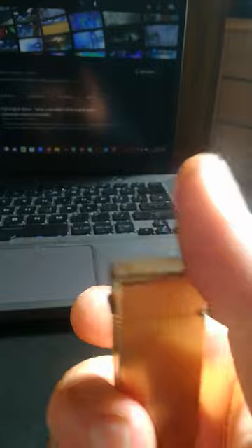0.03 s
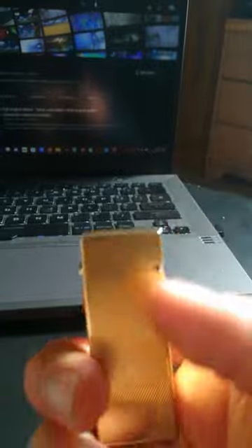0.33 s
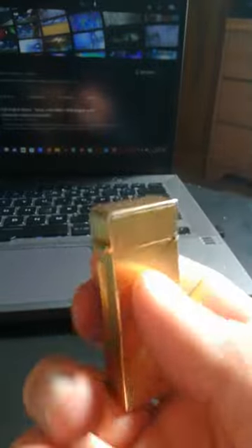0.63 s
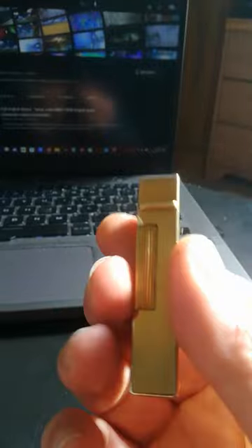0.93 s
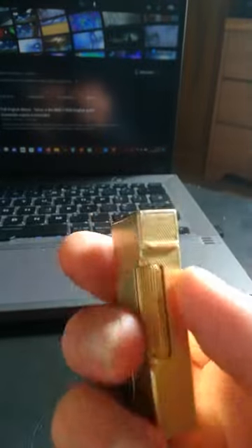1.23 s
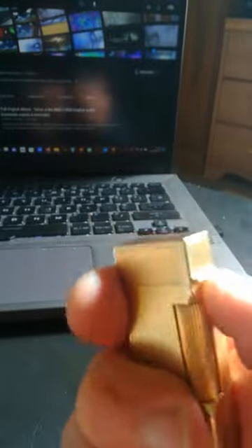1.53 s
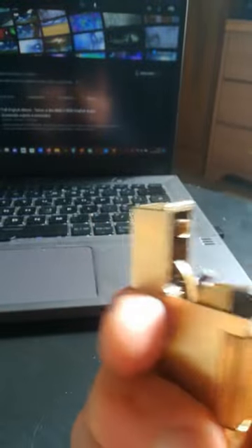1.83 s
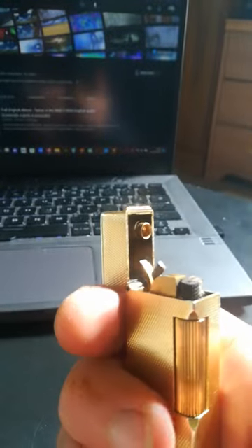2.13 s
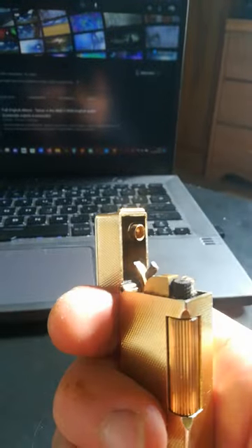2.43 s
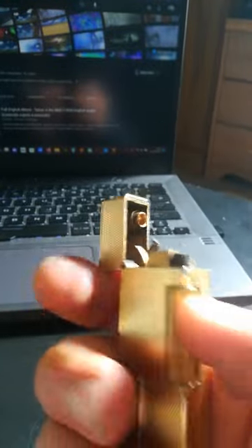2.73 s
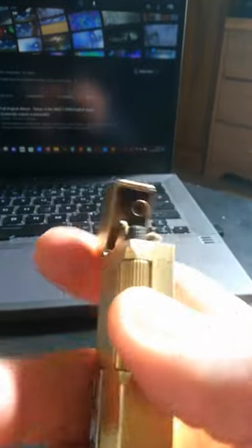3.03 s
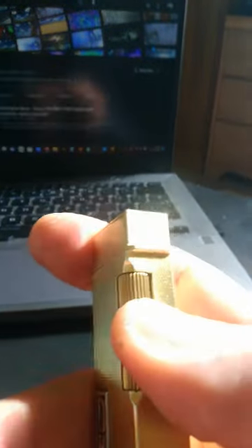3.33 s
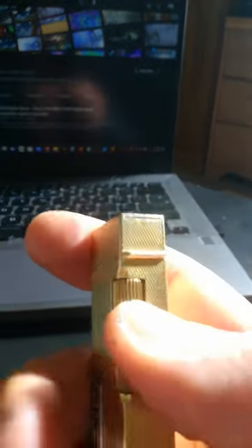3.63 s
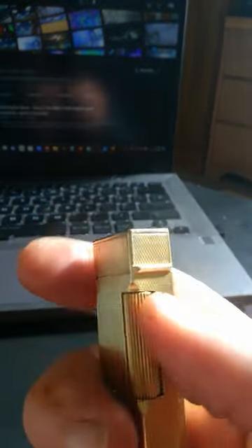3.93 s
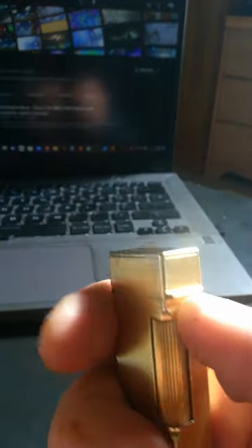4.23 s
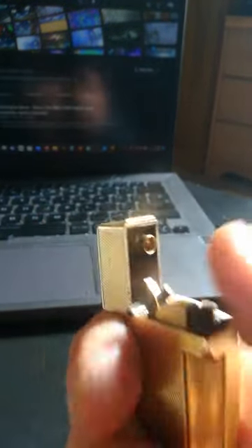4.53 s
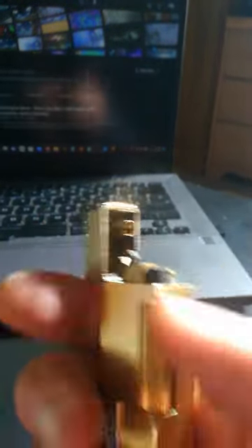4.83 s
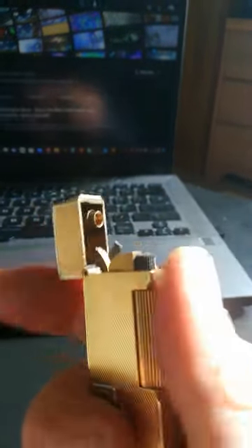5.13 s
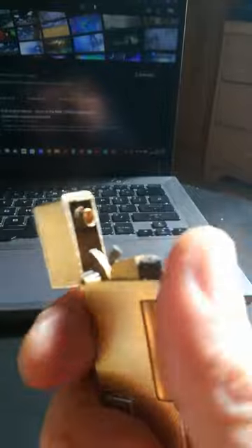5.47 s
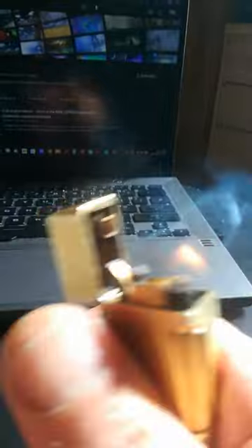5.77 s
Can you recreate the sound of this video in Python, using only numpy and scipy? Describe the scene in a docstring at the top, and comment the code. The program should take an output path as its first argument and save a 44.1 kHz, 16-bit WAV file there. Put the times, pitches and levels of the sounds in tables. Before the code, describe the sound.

In a quiet room a laptop fan blows faintly over a low hum. After about three seconds, a brass lighter's lid snaps shut with a short, bright ringing click, and a second later it is flicked open with another. Near the end the roller scrapes the flint sharply and clacks as the gas catches with a soft, low puff. The lighter is very close and to the left.

```python
"""A brass lighter is handled close to a phone's left microphone. Its lid snaps shut and is flicked
open, and each knock makes the metal ring. The thumb spins the roller over the flint, which scrapes
and throws sparks; the gas catches with a soft puff, and the roller clacks as the thumb slips off.
Behind it, a laptop hums and its fan blows in a quiet room."""
import sys
import numpy as np
from scipy import signal
from scipy.fft import rfft, irfft
from scipy.io import wavfile

SR = 44100
rng = np.random.default_rng(int(sys.argv[2]) if len(sys.argv) > 2 else 0)


def wav_record(signal):
    """Record a signal, one row per channel, as 16-bit PCM in the file named by sys.argv[1]."""
    frames = np.transpose(np.atleast_2d(signal))
    bounded = np.clip(frames, -1, 1)
    # unit amplitude maps onto the largest positive 16-bit level
    quanta = np.round(bounded * 32767).astype(np.int16)
    wavfile.write(sys.argv[1], SR, quanta)


N = 255780
TIME = np.arange(N) / SR
FREQS = np.fft.rfftfreq(N, 1 / SR)
STRIKE_S = 5.6130  # the roller bites the flint; scrape, sparks and puff are timed from here


def gain_of(db):
    """Turns decibels into a number to multiply a sound by."""
    return 10 ** (np.asarray(db) / 20)


def unit_power(x):
    """Scales a signal to an average power of one."""
    return x / np.sqrt(np.mean(x ** 2) + 1e-20)


def value_at(table, hz):
    """Reads between a table's rows, on a scale of octaves."""
    row_hz, values = np.transpose(table)
    return np.interp(np.log(hz + 1), np.log(row_hz + 1), values)


def add(mix, start_s, sound):
    """Mixes a sound in at the given time."""
    part = mix[round(start_s * SR):][:len(sound)]
    part += sound[:len(part)]


def tone_filter(tone, size=4096):
    """Builds a filter from a tone table; it never sounds ahead of its input."""
    log_gain = np.log(gain_of(value_at(tone, abs(np.fft.fftfreq(size, 1 / SR)))))
    return np.fft.ifft(np.exp(np.conj(signal.hilbert(log_gain)))).real[:size // 2]


def colour(x, tone):
    """Gives a sound a tone. White noise keeps its power, so only the table's shape counts."""
    taps = tone_filter(tone)
    return signal.oaconvolve(x, taps / np.linalg.norm(taps))[:N]


def grains(per_s, spread_db):
    """A dense crackle of tiny clicks of unequal size, as when rough surfaces rub."""
    size = gain_of(spread_db * np.minimum(rng.exponential(1, N), 3))
    sign = rng.choice([-1, 1], N)
    return unit_power(size * sign * (rng.random(N) < per_s / SR))


def swell(lag_s, rise_db_per_s, hold_s, fall_db_per_s):
    """A level that rises, holds and fades, reaching its top lag_s after the roller bites."""
    age = TIME - STRIKE_S - lag_s
    return gain_of(rise_db_per_s * np.minimum(age, 0) - fall_db_per_s * np.maximum(age - hold_s, 0))


# rush of the fan and room air on the left: (frequency [Hz], level in a 1 Hz band [dB])
FAN_TONE = [(12, -114), (30, -92), (70, -97.5), (100, -99.5), (135, -99), (220, -96), (330, -100),
            (460, -105), (750, -102), (1100, -102), (1650, -105), (2500, -108), (6000, -113), (15500, -116)]
# pitches that the fan's air duct boosts: (frequency [Hz], width [Hz], boost [dB])
FAN_DUCT = [(1080, 47, 3.5), (1520, 110, 4), (1826, 91.8, 4.9), (2094, 33.5, 1)]
# how alike the rush is at the two microphones: (frequency [Hz], likeness [0 to 1])
FAN_LIKENESS = [(40, .9), (130, 1), (300, 0.61), (650, 0.4), (1400, 0.25), (3000, 0.18), (7000, .12),
                (15000, .05)]
# how much louder it is on the left: (frequency [Hz], left minus right [dB])
FAN_BALANCE = [(60, -1), (200, -1.5), (380, .5), (700, 4.5), (1290, 3.5), (2380, 3), (4400, 3), (8120, 1.5),
               (15000, 1)]
def fan(lag_s=0.00059):
    """Air rushes through the laptop's duct and reaches the right microphone a little later."""
    left, unrelated = rfft(rng.standard_normal((2, N)))
    likeness = np.clip(value_at(FAN_LIKENESS, FREQS), 0, 1)
    delayed = left * np.exp(-2j * np.pi * FREQS * lag_s)
    right = likeness * delayed + np.sqrt(1 - likeness ** 2) * unrelated
    right /= gain_of(value_at(FAN_BALANCE, FREQS))
    duct_db = sum(db / (1 + (2 * (FREQS - hz) / width) ** 2) for hz, width, db in FAN_DUCT)
    tone = gain_of(value_at(FAN_TONE, FREQS) + duct_db)
    return irfft(np.array([left, right]) * tone, N) * np.sqrt(SR / 2)


# mains hum: (frequency [Hz], left level [dB], right level [dB], lag on the right [radians])
HUM_NOTES = [(100.2, -73.5, -74, .5), (198, -84.5, -81.5, 0.75)]
def hum(waver=0.2, drift_hz=3):
    """Mains power hums on two low notes that waver slowly in level and pitch."""
    drift = unit_power(irfft(rfft(rng.standard_normal(N)) * (FREQS < drift_hz), N))
    notes = np.zeros((2, N))
    for hz, left_db, right_db, lag in HUM_NOTES:
        phase = 2 * np.pi * hz * TIME + 2 * waver * drift
        notes += gain_of([[left_db], [right_db]]) * np.sin([phase, phase - lag])
    return np.sqrt(2) * notes * (1 + waver * drift)


# how long the room rings: (frequency [Hz], time to fade by 60 dB [s])
ROOM_FADE = [(200, 1.6), (1000, 0.3), (3000, 0.18), (7000, .27), (11000, 0.14), (15500, 0.24)]
# tone of that ringing: (frequency [Hz], relative level [dB])
ROOM_TONE = [(100, 0.5), (700, -1), (1500, -2), (3000, 2), (5000, -1.5), (7000, -2.5), (10000, 1.5),
             (15500, -2.5)]
# first bounces off the desk and walls: (delay [s], level [dB])
ROOM_ECHOES = [(0.0105, -29), (0.0158, -29.5), (.0172, -26.5), (.0255, -35)]
def room(x, tail_db, build_s=0.0099):
    """A few clear echoes and a blurred tail of sound whose treble dies before its bass."""
    count = SR // 2
    hz, t, bands = signal.stft(rng.standard_normal(count), SR, nperseg=256)
    bands *= gain_of(value_at(ROOM_TONE, hz)[:, None] - 60 * t / value_at(ROOM_FADE, hz)[:, None])
    tail = signal.istft(bands, SR, nperseg=256)[1][:count]
    tail *= 1 - np.exp(-(TIME[:count] / build_s) ** 2)
    tail *= gain_of(tail_db) / np.linalg.norm(tail)
    for delay_s, db in ROOM_ECHOES:
        add(tail, delay_s, gain_of([db]))
    return signal.oaconvolve(x, tail)[:N]


# what the right microphone loses of the lighter's sound: (frequency [Hz], level change [dB])
SHADOW_LOSS = [(100, -3), (700, -6.5), (1500, -7), (3000, -11), (5000, -21.5), (7000, -21.5),
               (10000, -25.5), (15000, -29)]
def shadow(x):
    """The right microphone faces away from the lighter, so it hears it dull and weak."""
    return signal.oaconvolve(x, tone_filter(SHADOW_LOSS))[:N]


def crack(hits, tone, boost_db):
    """The first touch of each hit is one sharp push, spread over a wide range of pitches."""
    pushes = np.zeros(N)
    for start_s, db in hits:
        add(pushes, start_s, gain_of([db + boost_db]))
    return colour(pushes, tone)


def ring(hits, notes, low_cut_hz, contact_s):
    """Each hit rings a brass part, which the hand quickly damps; wider notes die sooner."""
    t = np.arange(2048) / SR
    ping = sum((-1) ** k * gain_of(db) * width * np.exp(-np.pi * width * t) * np.cos(2 * np.pi * hz * t)
               for k, (hz, width, db) in enumerate(notes))
    ping *= 1 - np.exp(-t / contact_s)
    # so small a part gives off little bass
    ping = signal.sosfilt(signal.butter(6, low_cut_hz, "high", fs=SR, output="sos"), ping)
    ping /= np.sqrt(np.mean(ping[:256] ** 2))
    out = np.zeros(N)
    for start_s, db in hits:
        add(out, start_s, gain_of(db) * ping)
    return out


# a finger landing on the case: (time [s], relative level [dB])
TAP_HITS = [(4.8480, -68)]
# its dull tone: (frequency [Hz], relative level [dB])
TAP_TONE = [(1500, -25), (2800, 0), (3900, -1), (5000, -9), (9000, -14), (15000, -25)]
def finger_tap():
    """A finger taps the case as the grip shifts."""
    return crack(TAP_HITS, TAP_TONE, boost_db=22)


# rubs as the lid is eased up or flicked and the roller starts: (time [s], half length [s], level [dB])
SLIDE_RUBS = [(1.598, .014, -71), (1.640, .008, -73), (1.674, 0.014, -68.5), (4.388, 0.006, -53),
              (5.589, 0.0044, -47), (5.603, 0.0044, -36)]
# their tone: (frequency [Hz], relative level [dB])
SLIDE_TONE = [(1000, -34.5), (4000, -18), (6000, -1.5), (7500, -0.5), (9300, -3.5), (10800, -17),
              (16000, -25)]
def sliding():
    """Brass slides on brass at the lid's hinge and the roller's axle, with a faint, fine crackle."""
    touch = sum(gain_of(db) * np.exp(-((TIME - s) / half_s) ** 2) for s, half_s, db in SLIDE_RUBS)
    return colour(touch * grains(per_s=5000, spread_db=2), SLIDE_TONE)


# the lid landing on the case: (time [s], relative level [dB])
SHUT_HITS = [(3.1926, -17), (3.1951, -29.5)]
# notes of the closed case: (frequency [Hz], width [Hz], relative level [dB])
SHUT_NOTES = [(636.5, 140, -17.5), (1230, 240, -9.5), (1711, 333, -10.5), (3203, 280, -6),
              (3900, 360, -0.5), (4620, 360, -5.5), (6280, 600, 1), (7040, 540, 2), (7640, 200, -7.5),
              (8560, 310, -3.5), (9440, 288, -6.5), (10000, 446.4, -3), (12400, 830, -3.5),
              (14800, 900, -9.5)]
# tone of the first touch: (frequency [Hz], relative level [dB])
SHUT_TONE = [(530, -46.5), (900, -17), (1170, -14.5), (1270, -20.5), (1450, -13.5), (1660, -20.5),
             (1870, -19), (2710, -22), (3320, -11.5), (4310, -15), (6800, 1), (10800, -14), (12700, -9),
             (15700, -18)]
def lid_shut():
    """The lid snaps onto the case; gives the ring and the crack."""
    return (ring(SHUT_HITS, SHUT_NOTES, low_cut_hz=503.9, contact_s=0.0001),
            crack(SHUT_HITS, SHUT_TONE, boost_db=25.5))


# the lid hitting its stop: (time [s], relative level [dB])
OPEN_HITS = [(4.3941, -31), (4.3947, -19.5), (4.3970, -31)]
# notes of the open lid: (frequency [Hz], width [Hz], relative level [dB])
OPEN_NOTES = [(2450, 90, -13), (3080, 280, -15), (3430, 220, -19.5), (4590, 180, 2.5), (5330, 220, -5),
              (5770, 400, -4.5), (6240, 330, 3.5), (7960, 350, -14), (9000, 220, -7), (9550, 87, 1),
              (9940, 400, -6), (11100, 280, -17), (12400, 310, -23)]
# tone of the first touch: (frequency [Hz], relative level [dB])
OPEN_TONE = [(1290, -54), (2200, -22), (2630, -21.5), (3010, -11), (3680, -16), (4350, -1), (5450, -2),
             (6100, -1), (6720, -7), (8280, -19), (9120, -15.5), (9410, -4), (9960, -10), (11400, -23.5),
             (15000, -33.5)]
def lid_open():
    """The lid is flicked open against its stop; gives the ring and the crack."""
    return (ring(OPEN_HITS, OPEN_NOTES, low_cut_hz=2660, contact_s=0.00023),
            crack(OPEN_HITS, OPEN_TONE, boost_db=24.5))


# the roller knocking in its seat: (time [s], relative level [dB])
CLACK_HITS = [(5.6617, -10)]
# notes of the roller: (frequency [Hz], width [Hz], relative level [dB])
CLACK_NOTES = [(2010, 190, -16), (2870, 210, -8), (4530, 310, -5), (5226, 290, 6.5), (5835, 450, -0.5),
               (6440, 200, -3), (6960, 400, 0.5), (9676, 150, 7), (9900, 170, -0.5), (10870, 530, -3.5),
               (12000, 180, -9), (13100, 400, -16), (14700, 1000, -15)]
# tone of the first touch: (frequency [Hz], relative level [dB])
CLACK_TONE = [(790, -40), (1350, -25.5), (1890, -17), (2140, -12), (2350, -18), (3130, -10.5),
              (3890, -20.5), (4870, 2.5), (5450, 1), (5980, -9), (6980, 0), (8480, -17), (9890, 1),
              (10700, -10), (15700, -26)]
def roller_clack():
    """The roller clacks as the thumb slips off; gives the ring and the crack."""
    return (ring(CLACK_HITS, CLACK_NOTES, low_cut_hz=1150, contact_s=0.00025),
            crack(CLACK_HITS, CLACK_TONE, boost_db=24.5))


# the low puff that both microphones share: (frequency [Hz], relative level [dB])
PUFF_TONE = [(15, -12.5), (35, -13), (70, -3.5), (130, -14.5), (270, -20.5), (500, -45), (1500, -63)]
# small swirls of air at each microphone: (frequency [Hz], relative level [dB])
SWIRL_TONE = [(40, -16), (90, 7), (150, -2.5), (280, -2), (420, -19), (600, -11), (1100, -16), (2000, -35),
              (5000, -59)]
def flame(flutter_start_s=5.636, flutter_hz=34, flutter_rise_s=0.0057, flutter_fade_s=0.42):
    """The gathered gas burns off in a soft puff, then the air flutters and settles."""
    shared = colour(rng.standard_normal(N), PUFF_TONE)
    swirls = np.array([colour(noise, SWIRL_TONE) for noise in rng.standard_normal((2, N))])
    swirls *= gain_of([[-9], [-5]])  # left, right
    push = gain_of(-42) * swell(lag_s=0.002, rise_db_per_s=2600, hold_s=0.04, fall_db_per_s=340)
    # the swirls grow faster than the push that drives them
    puff = push * (shared + swirls * np.sqrt(push / push.max()))
    age = np.maximum(TIME - flutter_start_s, 0)
    flutter = gain_of(-35 - 60 * age / flutter_fade_s) * (1 - np.exp(-age / flutter_rise_s))
    return puff + flutter * np.sin(2 * np.pi * flutter_hz * age)


# the fine scrape of roller on flint: (frequency [Hz], relative level [dB])
SCRAPE_TONE = [(500, -67), (2500, -20), (4500, -9), (6500, 2), (8700, 5.5), (10500, -2.5), (12500, -7.5),
               (16000, -14)]
# the coarse sparking grains: (frequency [Hz], relative level [dB])
SPARK_TONE = [(200, -13), (700, -21.5), (1300, -2.5), (2800, -4), (4500, 2), (8000, -20), (12000, -10),
              (16000, -10)]
def flint(bite_db=2):
    """The roller scrapes the flint, bites, and tears off coarser grains that spark."""
    force = gain_of(-17.5) * swell(lag_s=0, rise_db_per_s=3000, hold_s=0.007, fall_db_per_s=1250)
    scrape = force * grains(per_s=8800, spread_db=1)
    add(scrape, STRIKE_S, gain_of([bite_db]))
    # most sparks burn out at once; the last ones fizzle on, weaker and longer
    spark_start = dict(lag_s=0.002, rise_db_per_s=6000, hold_s=0.011)
    shower = gain_of(-22.5) * swell(**spark_start, fall_db_per_s=2600)
    fizzle = gain_of(-34) * swell(**spark_start, fall_db_per_s=420)
    sparks = np.maximum(shower, fizzle) * grains(per_s=2200, spread_db=4)
    return colour(scrape, SCRAPE_TONE) + colour(sparks, SPARK_TONE)


def scene(right_lag_s=0.0003):
    """The lighter sits at the left microphone; the right one hears it dull, weak and later."""
    rings, cracks = np.sum([lid_shut(), lid_open(), roller_clack()], axis=0)
    handling = flint() + sliding() + finger_tap()
    # the flat brass faces ring towards the phone, while the cracks scatter all round the room
    near = rings + gain_of(-18.5) * cracks + handling
    scattered = gain_of(-12) * rings + cracks + handling
    far = np.zeros(N)
    add(far, right_lag_s, gain_of(-5) * near)
    left = near + room(scattered, tail_db=-16)
    right = shadow(far + room(scattered, tail_db=-14))
    return np.array([left, right]) + flame() + fan() + hum()


def record(dry, top_hz=15950):
    """The sharpest peaks overload and are flattened; then the highest treble is cut."""
    clipped = np.clip(dry, -1, 1)
    treble_cut = signal.firwin(255, top_hz, window=("kaiser", 10), fs=SR)
    return signal.oaconvolve(clipped, treble_cut[None], "same")


dry = scene()
out = record(dry)
wav_record(out)
```